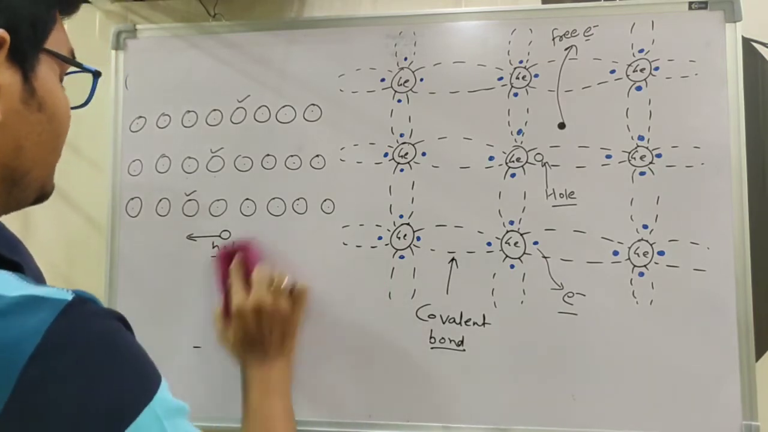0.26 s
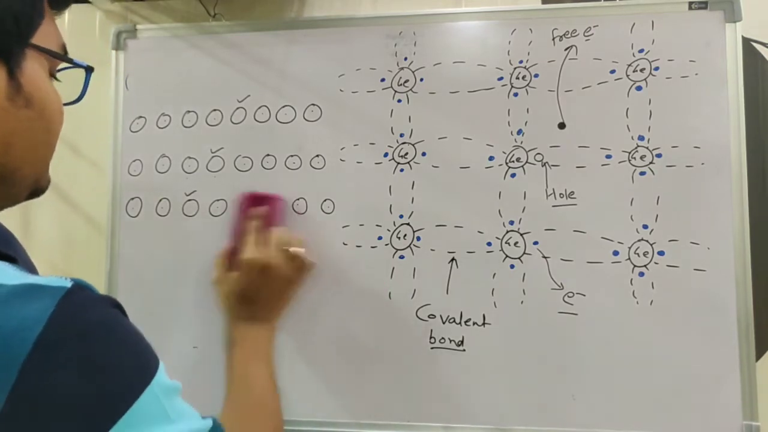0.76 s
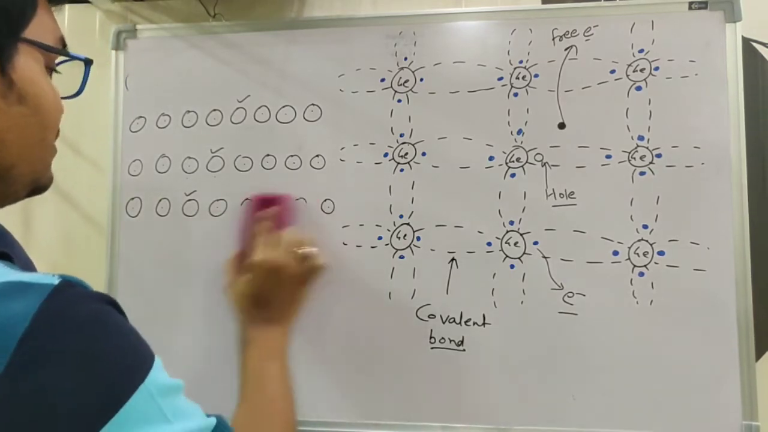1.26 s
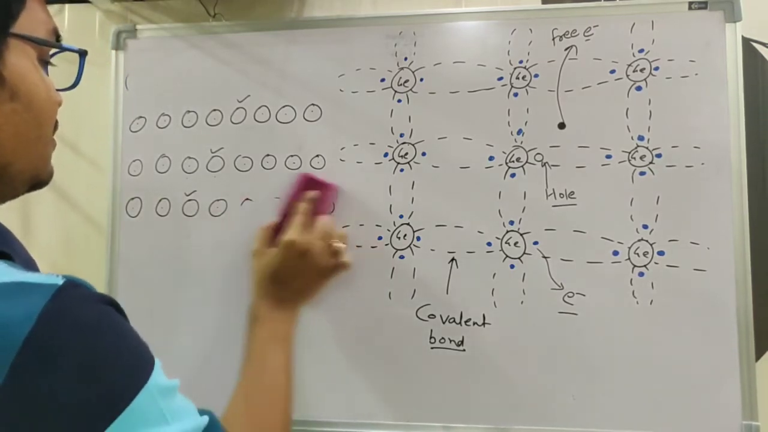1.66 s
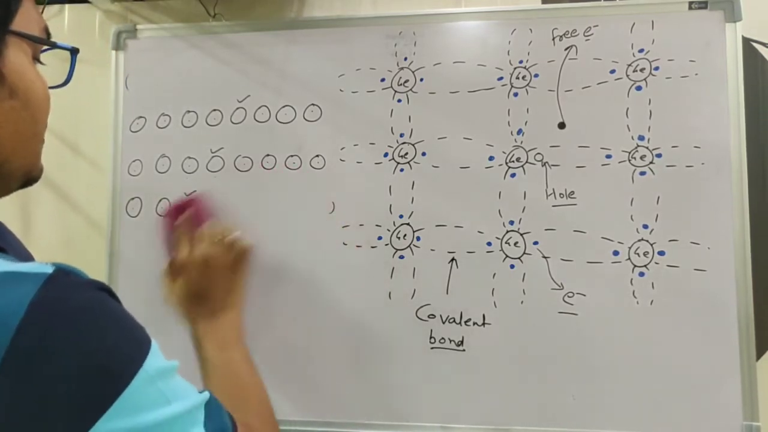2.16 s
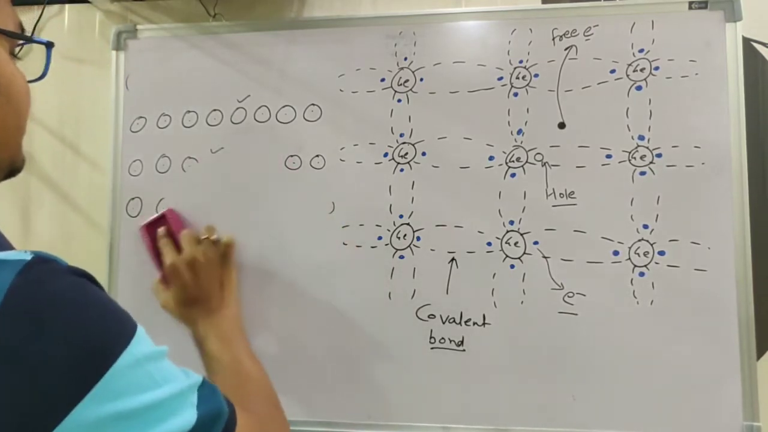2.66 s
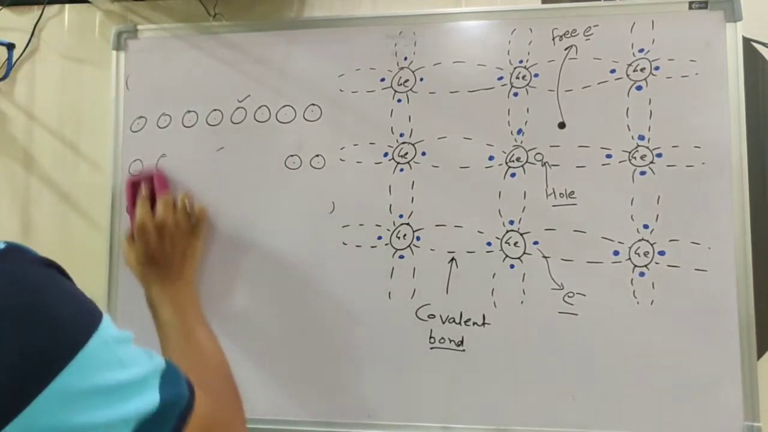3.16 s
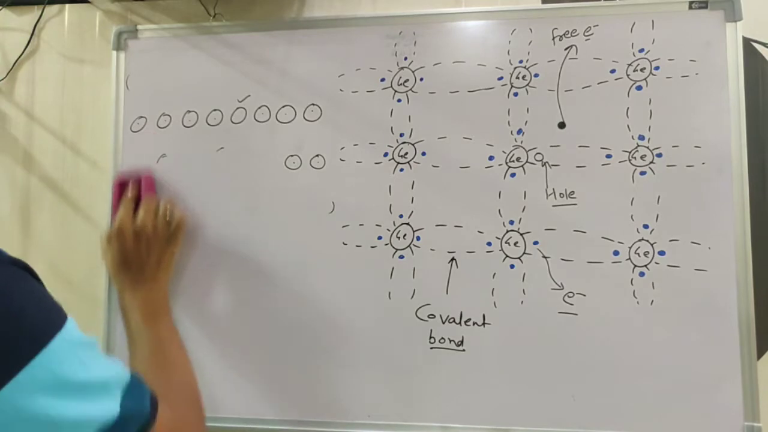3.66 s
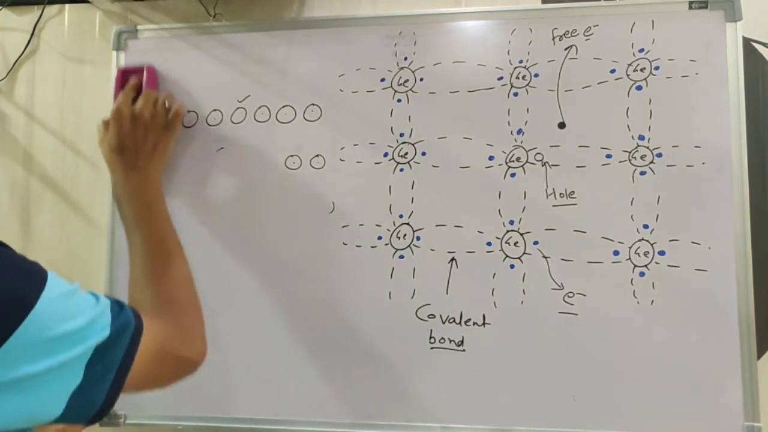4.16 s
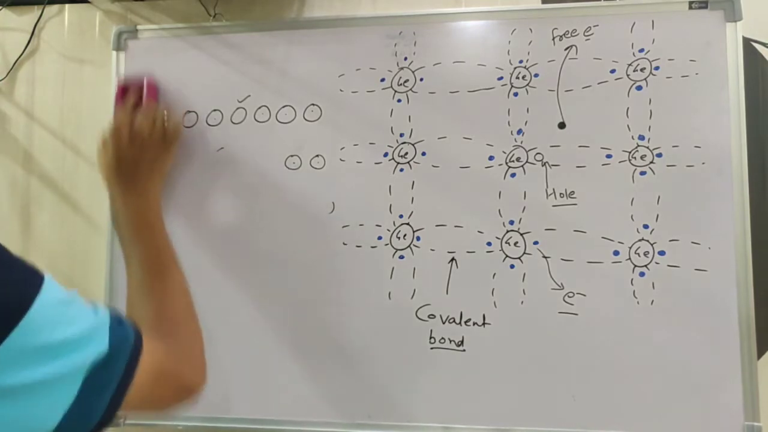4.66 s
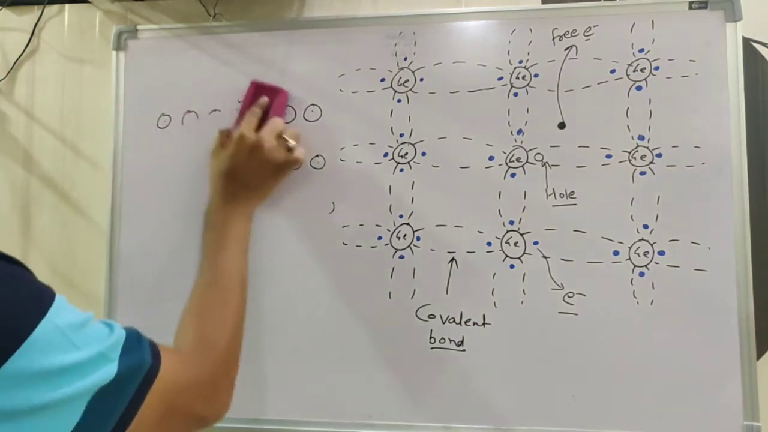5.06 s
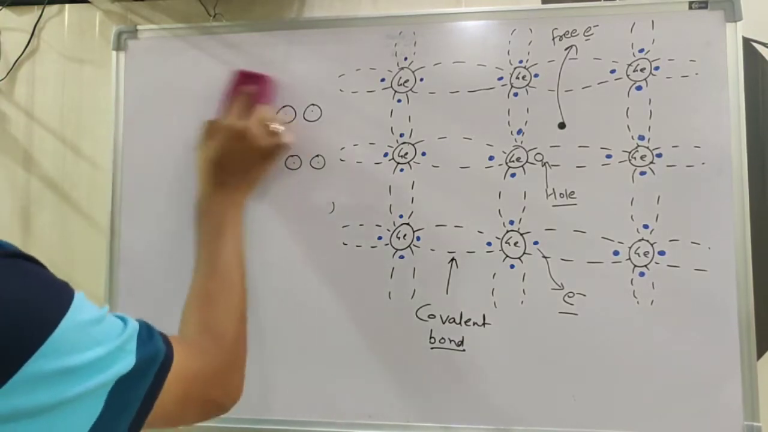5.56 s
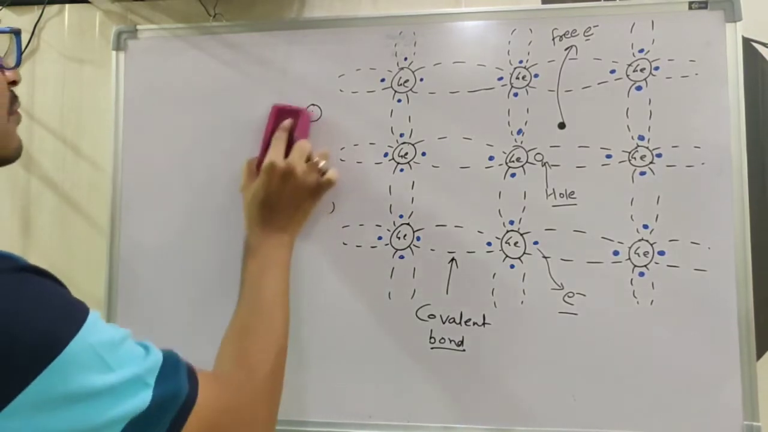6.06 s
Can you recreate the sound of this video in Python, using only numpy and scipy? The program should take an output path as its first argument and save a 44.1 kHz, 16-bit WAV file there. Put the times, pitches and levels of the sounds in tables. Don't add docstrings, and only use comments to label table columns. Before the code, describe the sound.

Dry, felty swishing sweeps to and fro over a whiteboard, never quite stopping, with a low flexing rumble from the panel. The eraser block thuds sharply near the start and more gently a second later. Later a ring clicks faintly, the strokes briefly slacken, and the felt edge scuffs roughly before rubbing resumes. Constant low fan noise fills the slightly echoing room, heard close on a phone microphone.

```python
import sys
import numpy as np
from scipy import signal
from scipy.fft import rfft, irfft
from scipy.io import wavfile
from scipy.ndimage import uniform_filter1d

SR = 44100
rng = np.random.default_rng(int(sys.argv[2]) if len(sys.argv) > 2 else 0)


def dump(signal):
    limited = np.clip(np.atleast_2d(signal).T, -1, 1)
    pcm = np.round(limited * 32767).astype(np.int16)
    wavfile.write(sys.argv[1], SR, pcm)


def convert_level_to_amplitude(level_db):
    exponent = np.asarray(level_db, float) / 20
    return 10 ** exponent


N = 277379

# frequency in Hz, width in Hz, boost in dB.
ROOM_MODES = [(60, 8, 2), (87.5, 5.9, 9.5), (100, 3.7, 3.5), (138, 16, -0.5), (166, 19, -7.5),
              (194.5, 12, 8), (194, 4.1, -0.5), (250.7, 10, 7), (418, 16, -5), (465, 10, -3),
              (557, 11.6, 6), (689, 8.6, 4.5)]


def level(x, db):
    return x * convert_level_to_amplitude(db) / np.sqrt(np.mean(x ** 2))


def colour(x, table, modes=()):
    hz = np.maximum(np.arange(N // 2 + 1) * SR / N, 1.)
    at_hz, db = np.transpose(table)
    db = np.interp(np.log(hz), np.log(at_hz), db)
    for centre_hz, width_hz, boost_db in modes:
        db = db + boost_db / (1 + (2 * (hz - centre_hz) / width_hz) ** 2)
    return level(irfft(rfft(x) * convert_level_to_amplitude(db), N), 0)


def ring(x, hz, t60):
    pole = np.exp(2j * np.pi * hz / SR - np.log(1000) / (t60 * SR))
    return signal.lfilter([1], [1, -pole], x).imag


def walk(rate):
    hold = int(SR / rate)
    steps = np.repeat(rng.standard_normal(N // hold + 1), hold)
    smooth = uniform_filter1d(uniform_filter1d(steps, hold), hold)[:N]
    return smooth / smooth.std()


def curves(table, t):
    s, *columns = np.transpose(table)
    return [np.interp(t, s, column) for column in columns]


def fibres(grain_db):
    return rng.standard_normal(N) * convert_level_to_amplitude(grain_db * rng.exponential(size=N))


def rubbing(t):
    # frequency in Hz, strength in dB per Hz.
    hiss_spectrum = [(800, -50), (2500, -16), (3500, -10.5), (5000, -6.5), (5800, -3), (6350, 0),
                     (6800, -7), (7600, -16.5), (7950, -25), (10000, -28), (16000, -32)]
    swish_spectrum = [(300, -50), (700, -17), (1200, 1.5), (2000, 1.5), (3500, 1.5), (5000, -9),
                      (7000, -36), (9000, -54)]
    drone_spectrum = [(70, -53), (150, -8.5), (230, -0.5), (350, 1), (600, -8), (950, -6.5), (1120, -18.5),
                      (1800, -46)]
    flex_spectrum = [(50, -55), (85, -27), (120, -1.5), (150, 7), (200, -4.5), (260, -40), (500, -66)]
    # time in seconds, panel drone level in dB, deep flexing in dB relative to the drone.
    pressure = [(0, -43, -8), (.29, -41.5, -3), (.36, -35.5, -4), (.6, -37.5, -6), (.85, -41, -5.5),
                (1.1, -39, -4.5), (1.6, -41, -7.5), (2.0, -42, -3.5), (2.35, -40.5, -3), (2.95, -41, -12),
                (3.6, -41.5, -4), (3.76, -39.5, 4), (3.9, -41, -11), (4.17, -44.5, -14), (4.33, -37, -4),
                (4.8, -38, -11.5), (5.1, -41.5, -2.5), (6.29, -41.5, -5)]
    hiss_db, swish_db, sink_db = hand(t)
    drone_db, flex_db = curves(pressure, t)
    drone_db = drone_db + 0.19 * sink_db
    catch_db = 0.19 * walk(24.4) + 0.34 * walk(90)

    drag = scuffing(t)
    hiss_gain = convert_level_to_amplitude(hiss_db + catch_db + 1.0) + convert_level_to_amplitude(-13) * drag
    swish_gain = convert_level_to_amplitude(swish_db + 0.55 * catch_db - 0.2) + convert_level_to_amplitude(-20) * drag
    drone_gain = convert_level_to_amplitude(drone_db + 1.27 * walk(20) - 1.14) + convert_level_to_amplitude(-17) * drag
    flex_gain = convert_level_to_amplitude(drone_db + flex_db + 1.7 * walk(9) - 2.5)

    hiss = colour(fibres(grain_db=2.0), hiss_spectrum) * hiss_gain
    swish = colour(fibres(grain_db=2.0), swish_spectrum) * swish_gain
    drone = colour(rng.standard_normal(N), drone_spectrum, ROOM_MODES) * drone_gain
    flex = colour(rng.standard_normal(N), flex_spectrum, ROOM_MODES) * flex_gain
    return hiss + swish + drone + flex


def hand(t):
    # turn in seconds, hiss in dB at the turn, hiss in dB at full speed,
    # duller swish at full speed in dB relative to the hiss.
    strokes = [(-.1, -46, -45.5, -4.5), (.09, -47, -45, -4), (.293, -52.5, -41.5, -1.5),
               (.5, -45.5, -43.5, -1.5), (.665, -47.5, -43.5, -3.5), (.881, -47.5, -43, -3),
               (1.137, -47, -43, -4), (1.331, -48.5, -45, -4), (1.522, -47.5, -44.5, -3.5),
               (1.76, -54, -44, -5), (1.971, -50, -45, -4.5), (2.128, -48.5, -45, -3),
               (2.35, -52, -46, -4.5), (2.574, -50, -44.5, -5), (2.769, -49.5, -46, -3),
               (3.019, -51, -45.5, -2.5), (3.21, -51, -45, -1), (3.462, -55, -44, -2.5),
               (3.699, -53, -43, -4.5), (4.02, -54.5, -53.5, -2), (4.15, -59, -48.5, -6),
               (4.352, -45, -44, -4), (4.498, -51.5, -44, -4.5), (4.668, -46.5, -44, -5),
               (4.927, -48, -45, -3.5), (5.179, -51.5, -44, -3), (5.427, -47, -44, -4.5),
               (5.634, -52.5, -44.5, -4.5), (5.85, -44.5, -44, -5.5), (6.161, -56, -45, -5)]
    last_stroke_s = 0.3
    fastest_at = 0.49
    swish_turn_share = 0.67
    turn_s, turn_db, full_db, swish_db = np.transpose(strokes)
    k = np.clip(np.searchsorted(turn_s, t) - 1, 0, len(turn_s) - 1)
    end_s = np.append(turn_s[1:], turn_s[-1] + last_stroke_s)
    done = np.clip((t - turn_s[k]) / (end_s - turn_s)[k], 0, 1)
    speed = np.sin(np.pi * done ** (np.log(.5) / np.log(fastest_at))).clip(0)
    slowest = convert_level_to_amplitude(np.interp(t, turn_s, turn_db))
    hiss_db = 20 * np.log10(slowest + (convert_level_to_amplitude(full_db[k]) - slowest) * speed)
    middle_s = (turn_s + end_s) / 2
    sink_db = hiss_db - np.interp(t, middle_s, full_db)
    swish_db = hiss_db - (1 - swish_turn_share) * sink_db + np.interp(t, middle_s, swish_db)
    return hiss_db, swish_db, sink_db


def scuffing(t):
    # peak time in seconds, level in dB, rise in seconds, fall in seconds.
    drags = [(3.48, -37, .001, .004), (3.484, -45, .003, 0.08), (4.317, -27.5, 0.027, 0.019),
             (4.385, -39.5, 0.012, 0.057), (4.62, -43.5, 0.037, 0.023), (4.835, -43.5, 0.032, 0.028)]
    total = np.zeros(N)
    for s, db, rise_s, fall_s in drags:
        side_s = np.where(t < s, rise_s, fall_s)
        total += convert_level_to_amplitude(db) * np.exp(-((t - s) / side_s) ** 2)
    return total


def scuffs(t):
    # frequency in Hz, strength in dB per Hz.
    scuff_spectrum = [(710, -40), (1200, -20), (3260, -18.5), (6290, 2), (6640, 1), (7910, -28),
                      (8830, -44), (14800, -43), (16000, -44), (16500, -77)]
    return colour(fibres(grain_db=2.5), scuff_spectrum) * scuffing(t) * convert_level_to_amplitude(1.3 * walk(150))


def knocks():
    # start in seconds, peak in dB, contact in milliseconds.
    blows = [(.3238, -12, 1.15), (.3282, -14, 1.45), (.3326, -11, 0.94), (.3425, -22, 1.3),
             (.3542, -20, 0.7), (.381, -17, 1.2), (.396, -21, 2.4), (.408, -23, 3.2), (.908, -28, 1.5),
             (1.334, -16, 1.9), (1.341, -22, 2.2), (1.576, -18, 1.9), (1.594, -34, 2.1), (1.614, -30, 1.2),
             (1.686, -21.5, 1.5), (1.693, -24, 1.3), (2.203, -37, 1.5), (3.21, -40, 0.78),
             (3.378, -23, 2.5), (3.759, -34, 1.7), (4.251, -39, 2), (4.298, -30, 1.5), (4.318, -25.5, 1.05)]
    # frequency in Hz, level in dB, time to fade by 60 dB in seconds.
    panel = [(178, -10, 0.086), (347, -7.5, 0.11), (470.3, -0.5, 0.096), (567, -3.5, 0.092),
             (690.5, -1, 0.092), (772, -4.5, 0.073), (835, -1, 0.03), (940, -2, 0.028)]
    push = np.zeros(N)
    for s, db, contact_ms in blows:
        n, i = max(int(contact_ms * SR / 1000), 4), int(s * SR)
        push[i:i + n] += convert_level_to_amplitude(db) * np.hanning(n) / n
    push = signal.sosfilt(signal.butter(2, 160, "high", fs=SR, output="sos"), push)
    out = np.zeros(N)
    for k, (hz, db, t60) in enumerate(panel):
        out += (-1) ** k * convert_level_to_amplitude(db) * ring(push, hz, t60)
    return convert_level_to_amplitude(-3.5) * out


def ticks():
    # start in seconds, peak in dB, frequency in Hz, time to fade by 60 dB in seconds.
    touches = [(1.045, -48.5, 2240, 0.67), (1.07, -44, 3900, .2), (2.15, -50, 4260, .4),
               (3.482, -36, 2310, 0.035), (3.483, -39, 2870, .06), (3.489, -46.5, 2610, 0.14),
               (3.484, -46, 2060, 0.07), (3.481, -44, 3600, .03), (3.481, -44, 4400, .03),
               (3.3, -50, 3020, .2), (5.328, -48, 2590, .08)]
    out = np.zeros(N)
    for s, db, hz, t60 in touches:
        hit = np.zeros(N)
        hit[int(s * SR)] = convert_level_to_amplitude(db)
        out += ring(hit, hz, t60)
    return out


def room(x):
    t60_s, build_s, tail_db = 0.43, 0.043, -11.5
    t = np.arange(SR // 2) / SR
    fade = np.exp(-np.log(1000) * t / t60_s) * np.minimum(t / build_s, 1)
    tail = rng.standard_normal(len(t)) * fade
    tail = tail / np.sqrt(np.sum(tail ** 2))
    return x + convert_level_to_amplitude(tail_db) * signal.fftconvolve(x, tail)[:N]


def air():
    # frequency in Hz, strength in dB per Hz.
    air_spectrum = [(25, -30), (52, -28.5), (70, -13), (82, -11.5), (130, -4), (250, -4.5), (500, -10),
                    (950, -12.5), (1150, -15.5), (3000, -22.5), (6300, -26), (7600, -41), (8000, -60),
                    (16000, -38.5)]
    fan_hz, fan_db, air_db = 85, -56.5, -41.5
    wavering_hz = fan_hz * (1 + 0.0073 * walk(5.9))
    hum = np.sin(2 * np.pi * np.cumsum(wavering_hz) / SR) * convert_level_to_amplitude(fan_db + 0.67 * walk(9.0))
    rush = colour(rng.standard_normal(N), air_spectrum, ROOM_MODES)
    return hum + rush * convert_level_to_amplitude(air_db - 1.0 + 0.23 * walk(1.77))


def slips(x):
    # middle in seconds, centre frequency in Hz.
    partings = [(.53, 9000), (1.32, 13100), (1.36, 4700), (1.64, 11000), (2.895, 7600), (2.895, 11700),
                (3.595, 5700), (3.78, 11000), (3.83, 7500), (3.85, 9700), (3.85, 7200), (3.895, 6900),
                (3.895, 5300), (5.705, 11700), (5.89, 13700), (6.01, 6200)]
    width_hz, spread_s, slip_db = 1400, 0.0095, -1
    n = SR // 10
    out = np.zeros(N)
    hz = np.arange(n // 2 + 1) * SR / n
    fade = np.exp(-((np.arange(n) - n / 2) / SR / spread_s) ** 2)
    for s, centre_hz in partings:
        i = int(s * SR) - n // 2
        in_band = abs(hz - centre_hz) < width_hz / 2
        band = irfft(rfft(x[i:i + n][::-1]) * in_band, n)
        out[i:i + n] += convert_level_to_amplitude(slip_db) * fade * band
    return out


def scene():
    t = np.arange(N) / SR
    mono = rubbing(t) + scuffs(t) + room(knocks() + ticks()) + air()
    return np.array([mono, mono])


def band_limit(x):
    return signal.sosfilt(signal.butter(12, 15730, fs=SR, output="sos"), x)


def record(dry):
    apart = slips(dry[0]) * np.array([[1], [-1]])
    return band_limit(dry + apart)


dry = scene()
out = record(dry)
dump(out)
```